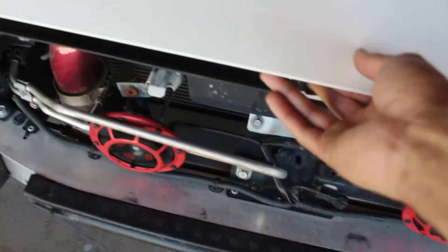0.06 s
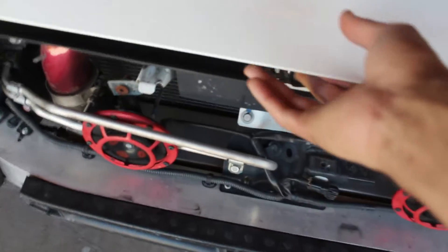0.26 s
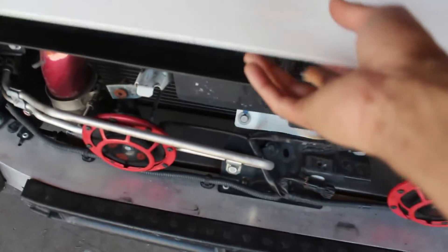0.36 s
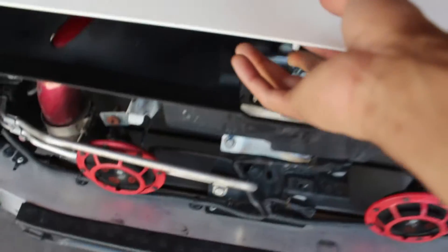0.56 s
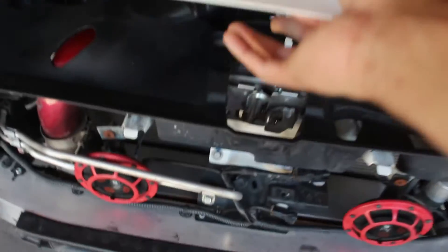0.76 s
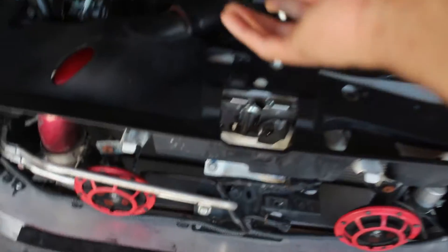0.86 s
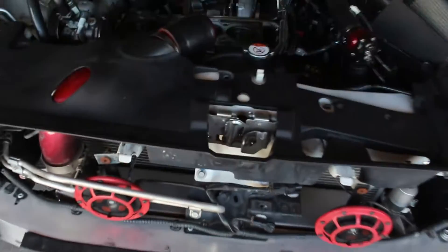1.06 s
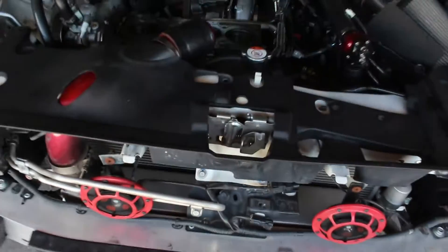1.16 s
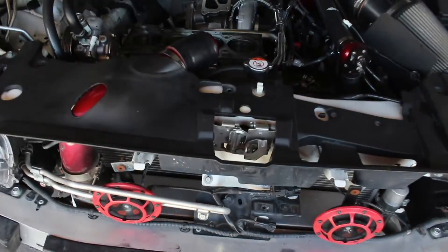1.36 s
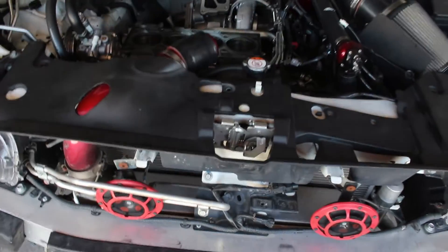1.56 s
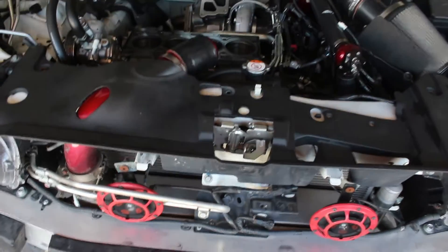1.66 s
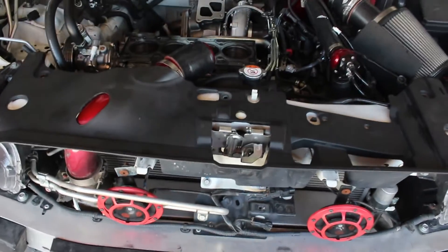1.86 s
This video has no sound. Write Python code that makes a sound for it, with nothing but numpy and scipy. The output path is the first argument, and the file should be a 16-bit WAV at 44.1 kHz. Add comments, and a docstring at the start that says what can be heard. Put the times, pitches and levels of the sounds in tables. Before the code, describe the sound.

A car hood latch clicks lightly, scrapes briefly and snaps free with a loud, ringing metal clack. Gas struts then hiss faintly with gliding tones as the hood rises, heard close up in a garage over a low rumble.

```python
"""Opening a car bonnet

Close by in a garage, a hand clicks the safety catch aside. The striker (the metal loop that the hook
holds) scrapes up the hook and snaps free with a loud clack that rings the sheet metal. The gas struts
then hiss with gliding tones as the bonnet rises, over a low rumble. A limiter turns the clack down."""
import sys
import numpy as np
from scipy import signal
from scipy.fft import rfft, irfft
from scipy.io import wavfile
from scipy.ndimage import uniform_filter1d, minimum_filter1d

SR = 44100
rng = np.random.default_rng(int(sys.argv[2]) if len(sys.argv) > 2 else 0)


def wav_out(sig):
    """Save sig, one row per channel (or a flat mono array), as 16-bit PCM at SR to the path in sys.argv[1]."""
    wavfile.write(sys.argv[1], SR, np.round(np.clip(np.atleast_2d(sig).T, -1, 1) * 32767).astype(np.int16))


N = 83790

# Blows of the snap. Each row: start in seconds, level in dB, extra dB for the clear tones.
SNAP_BLOWS = [(0.3863, -3, -5), (0.3894, -6.5, 1), (0.3962, -29, 4.5)]
# Hits of the catch and of the rattling hook. Each row: start in seconds, level in dB.
CATCH_HITS = [(0.1532, -24.5), (0.1563, -21.5), (0.161, -38)]
HOOK_HITS = [(0.4575, -25.5), (0.4655, -29), (0.47, -36.5)]
# Clear tones of struck metal. Each row: pitch in Hz, level in dB, seconds to fade by 60 dB.
SNAP_TONES = [(199, -20.5, 0.29), (362.5, -21, 0.5), (433, -20.5, 0.41), (530, -18, 0.14),
              (647, -21.5, 0.2), (659, 0.5, 0.022), (1379, -17, 0.2), (1964, -2.5, 0.034),
              (8240, -14.5, 0.05)]
CATCH_TONES = [(365.4, -12.5, 0.18), (429, -10, .08), (1090, -9.5, 0.16), (1298, -19, 0.22),
               (1479, -8, 0.15), (1760, -9, 0.1), (2110, -12, 0.075), (3540, -4.5, 0.05)]
# How long the noisy rings and the echo last. Each row: frequency in Hz, seconds to fade by 60 dB.
SNAP_FADE = [(200, 0.12), (700, 0.036), (2000, 0.074), (5000, 0.046), (11000, 0.024)]
CATCH_FADE = [(400, 0.13), (3000, 0.094), (9000, 0.037)]
ECHO_FADE = [(150, .5), (500, 0.3214), (2000, 0.385), (5000, 0.26), (11000, 0.2047)]
# Each sound's colour, its mix of low and high. Each row: frequency in Hz, relative level in dB.
SNAP_COLOUR = [(70, -40), (130, -35), (200, 2.5), (300, -11), (420, 8.5), (680, 3), (900, -2.5),
               (1650, -11.5), (2050, -1.5), (2700, -16.5), (3700, -13.5), (5900, -12), (8500, -15),
               (11200, -14.5), (13000, -35), (16000, -37)]
HOOK_COLOUR = [(150, -10), (500, 6.5), (3800, 1), (6000, -2.5), (7000, -8.5), (8600, -5), (16000, -51)]
SCRAPE_COLOUR = [(80, -43), (220, 4), (700, 1.5), (1200, -10), (2400, -11), (5500, -28), (16000, -68)]
SHUDDER_COLOUR = [(100, -21), (200, -1.5), (450, -2.5), (1100, -8.5), (16000, -52)]
CATCH_COLOUR = [(100, -48), (280, -7), (400, 3.5), (1100, -5), (2250, -1.5), (2700, -11.5), (3600, -8),
                (5300, -9), (6500, -25.5), (9800, -22.5), (12500, -50), (16000, -56)]
TICK_COLOUR = [(150, -23), (400, 11), (900, -17), (4300, -44), (5600, -18), (6800, -46)]
HISS_COLOUR = [(300, -6), (1100, 11), (1600, -1), (2800, -1.5), (5800, -14), (7000, 0), (9000, -5),
               (13300, -14.5), (15500, -22)]
ECHO_COLOUR = [(100, 1), (500, -2.5), (2000, -5.5), (5000, -1), (9000, -7.5), (15000, -8)]
RUMBLE_COLOUR = [(20, -18), (50, -11), (88, 1.5), (200, -8.5), (290, -13.5), (900, -18), (1500, -26.5),
                 (2600, -32.5), (4300, -35.5), (8000, -40), (12000, -45), (16000, -52)]
# How the scrape, gas flow and hiss swell. Each row: time in seconds, relative level in dB.
SCRAPE_SWELL = [(.33, -63), (.342, -43), (.365, -36.5), (.384, -24.5)]
FLOW_SWELL = [(.95, -12), (1.33, -7), (1.62, -4.5), (1.9, -1)]
HISS_SWELL = [(.6, -18), (.9, -4), (1.25, -14), (1.5, -0.5), (1.9, 6.5)]
# Lowest tone of the struts' shrinking and growing gas chambers. Each row: time in seconds, pitch in Hz.
SHRINKING_PITCH = [(.9, 2015), (1.25, 2327), (1.48, 2750), (1.58, 2918), (1.69, 3340), (1.75, 3794),
                   (1.9, 4750)]
GROWING_PITCH = [(1.45, 2500), (1.65, 2070), (1.78, 1885), (1.9, 1740)]
# Each chamber's tones, lowest first. Each entry: level in dB before the swell is added.
SHRINKING_LEVELS = [-58.5, -65, -66]
GROWING_LEVELS = [-50.5, -60.5, -66, -64, -65]
# Strut whistles. Each row: start and length in seconds, first and last pitch in Hz, level in dB.
STRUT_WHISTLES = [(1.06, 0.16, 4320, 4650, -64.5), (1.186, 0.11, 2750, 2320, -61),
                  (1.39, .14, 5400, 5670, -70), (1.62, .065, 6420, 6300, -63)]
# Stereo width of the metal sounds and echo, and of the gas and rumble.
# Each row: frequency in Hz, level in dB of the wide part against the middle part.
METAL_WIDTH = [(60, -13), (150, -30), (380, -21.5), (950, -12.5), (2380, -8.5), (5980, -12), (15000, 3)]
AIR_WIDTH = [(60, -32), (150, -16), (380, -8.5), (950, -5.5), (2380, 0.5), (5980, 0), (15000, -0.5)]
# The latch is softer on the left. Each row: frequency in Hz, change of level in dB.
LEFT_COLOUR = [(400, -1.04), (1300, -0.5), (2200, -2.5), (4400, -1)]


def snap():
    """The striker jumps off the hook and rings latch and bonnet; the hook rattles back."""
    out, tones = np.zeros((2, N)), ring(SNAP_TONES)
    for start, db, tones_db in SNAP_BLOWS:
        clang = die_away(noise(SNAP_COLOUR), SNAP_FADE)
        add(out, start, amp(db) * (amp(tones_db) * tones + clang))
    for start, db in HOOK_HITS:
        add(out, start, amp(db) * die_away(noise(HOOK_COLOUR), CATCH_FADE))
    return out


def scrape(slips_per_s=3200):
    """The striker slides up the hook in tiny slips that grow stronger until it is free."""
    t = np.arange(N) / SR
    sliding = (t > SCRAPE_SWELL[0][0]) & (t < SNAP_BLOWS[0][0])
    return crackle(slips_per_s, SCRAPE_COLOUR) * amp(curve(SCRAPE_SWELL)) * sliding


def shudder(knocks_per_s=350, length_s=0.14, spring_hz=2090, spring_fade_s=2.5):
    """The freed bonnet rattles with many small knocks, and the latch spring rings on."""
    t, out = np.arange(N) / SR, np.zeros((2, N))
    panel = amp(-29) * crackle(knocks_per_s, SHUDDER_COLOUR) * np.exp(-(t / length_s) ** 4)
    spring = resonate(stereo_noise(METAL_WIDTH), np.full(N, spring_hz), width_hz=100)
    spring *= amp(-56.5 - 60 * t / spring_fade_s)
    add(out, SNAP_BLOWS[0][0], build_up() * (panel + spring))
    return out


def catch(tick_s=0.3135):
    """The catch lever chatters against its stop; then the striker meets the hook with a tick."""
    out, tones = np.zeros((2, N)), ring(CATCH_TONES)
    for start, db in CATCH_HITS:
        add(out, start, amp(db) * (tones + die_away(noise(CATCH_COLOUR), CATCH_FADE)))
    add(out, tick_s, amp(-35) * die_away(noise(TICK_COLOUR), CATCH_FADE))
    return out


def struts(flutter_db=0.5):
    """A piston shortens one gas chamber (rising tones) and lengthens the other; its seal hisses."""
    flow_db = curve(FLOW_SWELL)
    rising = chamber(SHRINKING_PITCH, GROWING_PITCH, SHRINKING_LEVELS, width_hz=250) * amp(flow_db)
    falling = chamber(GROWING_PITCH, SHRINKING_PITCH, GROWING_LEVELS, width_hz=72)
    falling *= amp(2.53 * flow_db)  # the growing chamber sings only in strong flow
    hiss = amp(-58 + curve(HISS_SWELL)) * noise(HISS_COLOUR, AIR_WIDTH)
    return (rising + falling + hiss) * amp(flutter_db * wobble())


def chamber(pitch, other_pitch, levels_db, width_hz, crossing_db=2, waver_db=0.8):
    """Rushing gas makes a tube sing; its tones glide as its length changes."""
    out = np.zeros((2, N))
    for k, db in enumerate(levels_db, 1):
        gas, hz = stereo_noise(AIR_WIDTH), k * curve(pitch)
        # each upper tone swells as it crosses a tone of the other chamber
        meeting = (0.5 - abs(np.sin(np.pi * hz / curve(other_pitch)))) * (k > 1)
        gain = amp(db + crossing_db * meeting + waver_db * wobble())
        out += gain * resonate(gas, hz, width_hz * np.sqrt(k))
    return out


def whistles():
    """The struts whistle in short glides that swell and fade."""
    out = np.zeros((2, N))
    for start, length, from_hz, to_hz, db in STRUT_WHISTLES:
        glide = curve([(start, from_hz), (start + length, to_hz)])
        swell = np.sin(np.pi * curve([(start, 0), (start + length, 1)]))
        out += amp(db) * swell * resonate(stereo_noise(AIR_WIDTH), glide, width_hz=90)
    return out


def garage(x, onset_s=0.0053):
    """Sound bounces around the engine bay and off the walls, blurring into a short echo."""
    fade_in = 1 - np.exp(-np.arange(N) / SR / onset_s)
    tail = unit(die_away(stereo_noise(METAL_WIDTH), ECHO_FADE) * fade_in) / np.sqrt(N)
    source = colour(x.mean(0), ECHO_COLOUR)
    return signal.fftconvolve(source[None], tail, axes=1)[:, :N]


def rumble():
    """A low, steady noise in the background."""
    return amp(-44) * noise(RUMBLE_COLOUR, AIR_WIDTH)


def to_the_right(x, lag_s=0.00003):
    """The latch is a little to the right, so it reaches the left side later and softer."""
    hz = np.fft.rfftfreq(N, 1 / SR)
    late = irfft(rfft(x[0]) * np.exp(-2j * np.pi * hz * lag_s), N)
    return np.array([colour(late, LEFT_COLOUR), x[1]])


def ring(rows):
    """Struck metal rings with clear, fading tones and gives off little bass."""
    t = np.arange(N) / SR
    tones = sum(amp(db - 60 * t / fade_s) * np.sin(2 * np.pi * hz * t) for hz, db, fade_s in rows)
    return cut_bass(tones * build_up(), hz=169)


def die_away(x, fades):
    """Starts x like a blow, then lets each frequency band fade at its own speed."""
    t, hz, spectrum = np.arange(N) / SR, np.fft.rfftfreq(N, 1 / SR), rfft(x)
    centres, times = np.transpose(fades)
    bands = [irfft(spectrum * read(np.c_[centres, pick], hz), N) for pick in np.eye(len(times))]
    return build_up() * sum(band * amp(-60 * t / fade_s) for band, fade_s in zip(bands, times))


def build_up(contact_s=0.00019):
    """A blow builds up over the brief time that the parts touch."""
    return 1 - np.exp(-(np.arange(N) / SR / contact_s) ** 2)


def resonate(x, hz, width_hz):
    """Keeps a narrow band of x around the moving pitch hz, at strength 1."""
    turn = np.exp(2j * np.pi * np.cumsum(hz) / SR)
    r = np.exp(-np.pi * width_hz / SR)
    band = signal.lfilter([(1 - r) ** 2], [1, -2 * r, r * r], x / turn)
    return unit((turn * band).real)


def crackle(per_s, points):
    """Tiny clicks at random times, with a given colour, at strength 1."""
    clicks = rng.standard_normal((2, N)) * (rng.random(N) < per_s / SR)
    return unit(colour(spread(clicks, METAL_WIDTH), points))


def noise(points, width=METAL_WIDTH):
    """Stereo noise with a given colour, at strength 1."""
    return unit(colour(stereo_noise(width), points))


def stereo_noise(width):
    """Plain noise spread over left and right."""
    return spread(rng.standard_normal((2, N)), width)


def spread(pair, width):
    """Turns two unrelated signals into left and right, nearly alike in the bass."""
    side = colour(pair[1], width)
    return np.array([pair[0] + side, pair[0] - side])


def wobble(smooth_s=0.046):
    """Slow random drift, at strength 1."""
    return unit(uniform_filter1d(rng.standard_normal(N), size=int(smooth_s * SR)))


def colour(x, points):
    """Turns each frequency up or down by a table in dB."""
    return irfft(rfft(x) * amp(read(points, np.fft.rfftfreq(N, 1 / SR))), N)


def cut_bass(x, hz):
    """Weakens everything below hz."""
    return signal.sosfilt(signal.butter(2, hz, "high", fs=SR, output="sos"), x)


def read(points, hz):
    """Reads between the rows of a frequency table, with octaves evenly spaced."""
    row_hz, value = np.transpose(points)
    return np.interp(np.log(hz + 1), np.log(row_hz + 1), value)


def curve(points):
    """Reads a time table at every sample."""
    return np.interp(np.arange(N) / SR, *np.transpose(points))


def add(mix, start_s, sound):
    """Adds a sound to the mix at a given time."""
    part = mix[:, round(start_s * SR):][:, :sound.shape[1]]
    part += sound[:, :part.shape[1]]


def amp(db):
    """Turns decibels into a number to multiply by."""
    return 10 ** (np.asarray(db) / 20)


def unit(x):
    """Scales x to an average strength (rms) of 1."""
    return x / np.sqrt(np.mean(x ** 2) + 1e-20)


def scene():
    """Mixes the latch, its echo, the struts and the background."""
    click = catch()
    clack = snap() + scrape() + shudder()
    echo = garage(amp(-4) * click + amp(-2.5) * clack)
    latch = cut_bass(click + clack + echo, hz=130)
    return to_the_right(latch) + struts() + whistles() + rumble()


def record(dry, ceiling_db=0.5, hold_s=0.051, recover_db_per_s=154, top_hz=16300):
    """A limiter turns loud peaks down, waits and recovers; then the highest treble is cut."""
    over_db = np.maximum(20 * np.log10(abs(dry).max(0) + 1e-9) - ceiling_db, 0)
    half_hold = int(hold_s * SR) // 2
    held_db = -minimum_filter1d(-over_db, 2 * half_hold + 1, origin=half_hold)
    recovery_db = np.arange(N) / SR * recover_db_per_s
    dip_db = uniform_filter1d(np.maximum.accumulate(held_db + recovery_db) - recovery_db, size=24)
    limited = np.clip(dry * amp(-dip_db), -1, 1)
    treble_cut = signal.firwin(511, top_hz, window=("kaiser", 9), fs=SR)
    return signal.oaconvolve(limited, treble_cut[None], "same")


dry = scene()
out = record(dry)
wav_out(out)
```